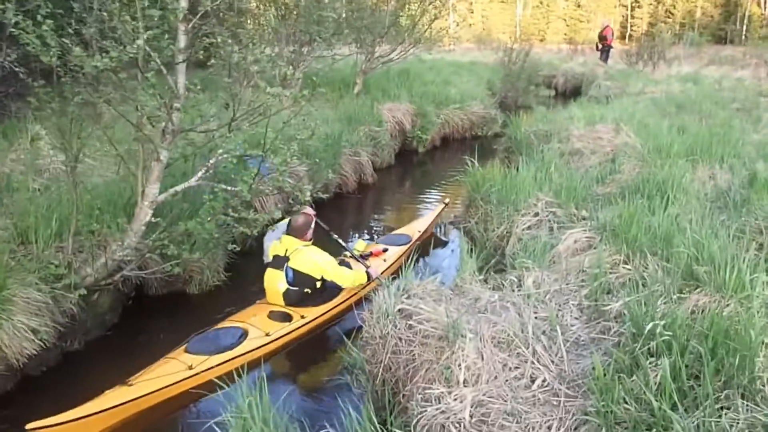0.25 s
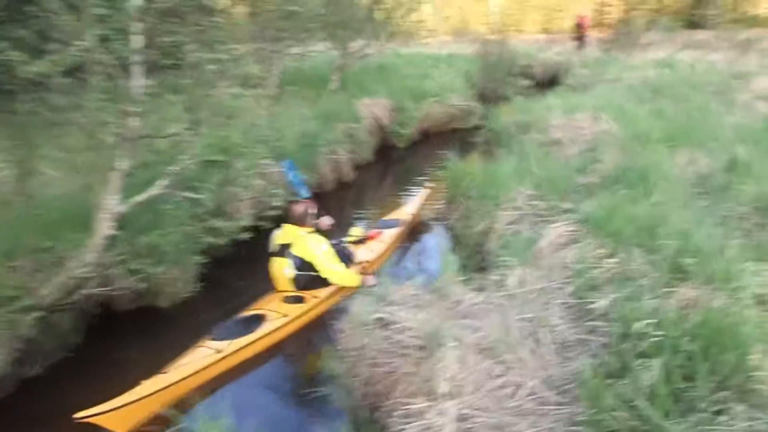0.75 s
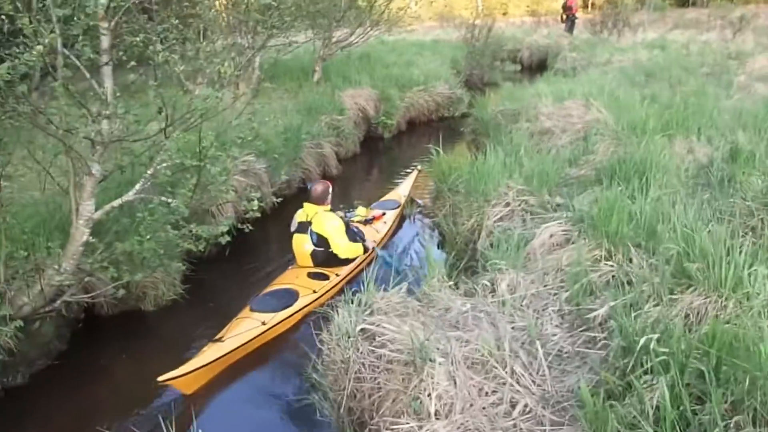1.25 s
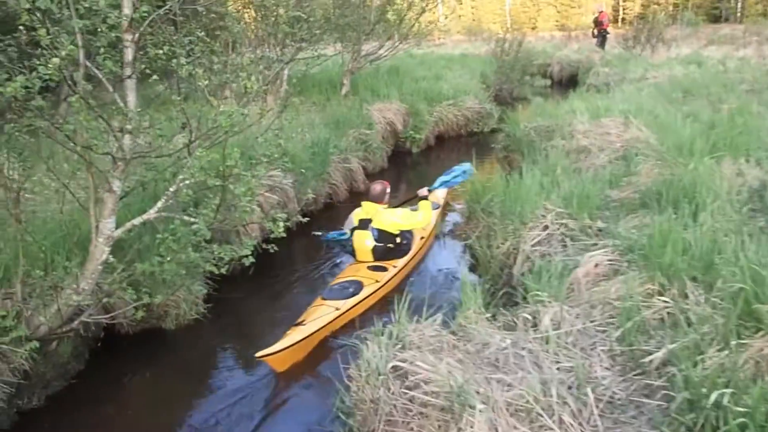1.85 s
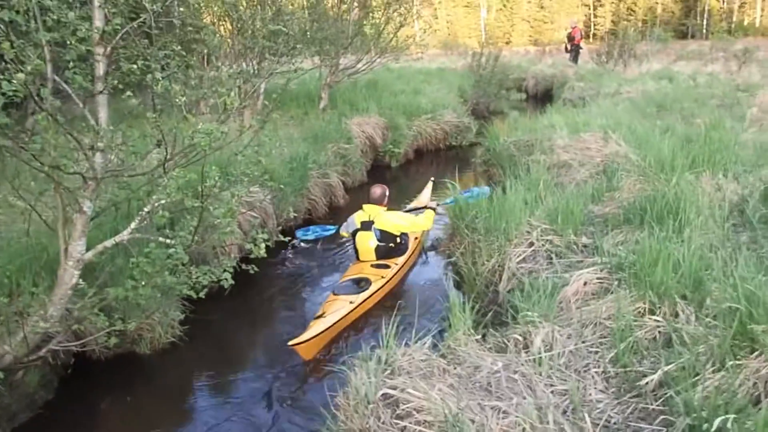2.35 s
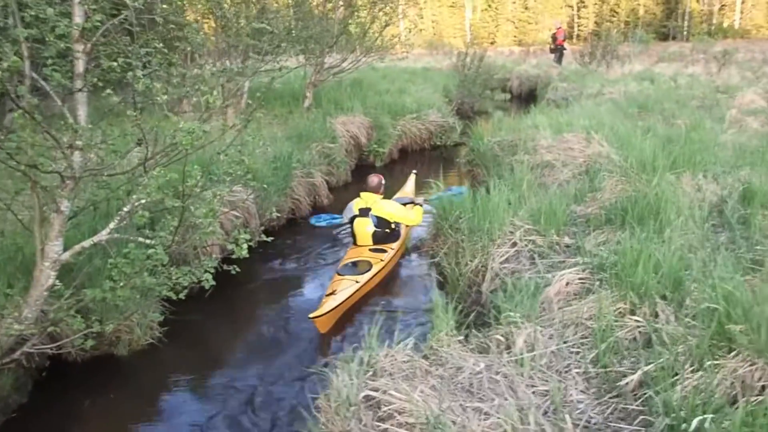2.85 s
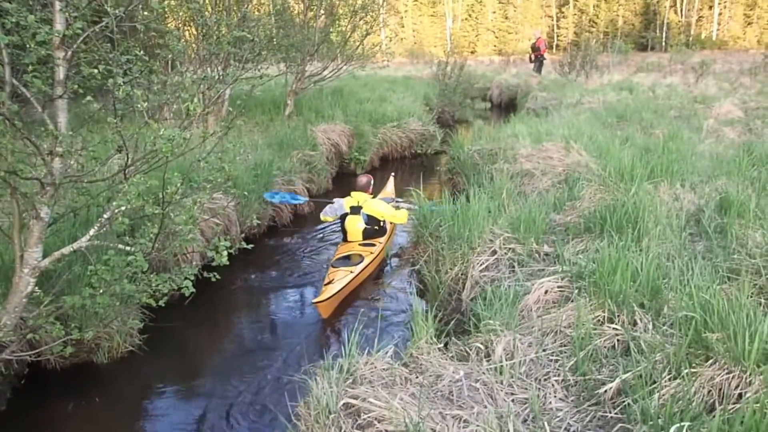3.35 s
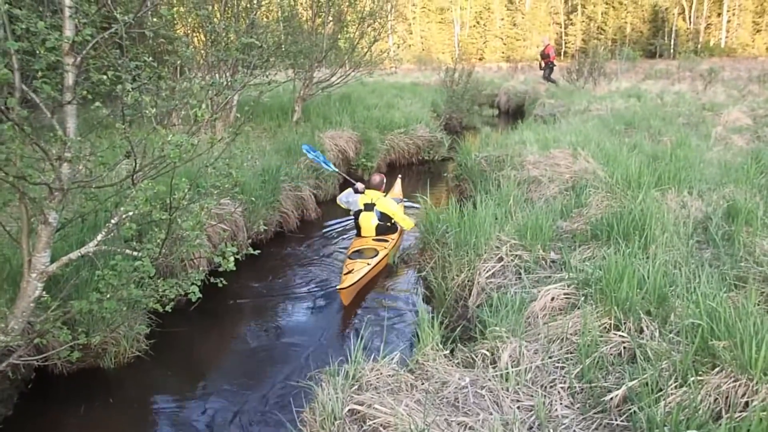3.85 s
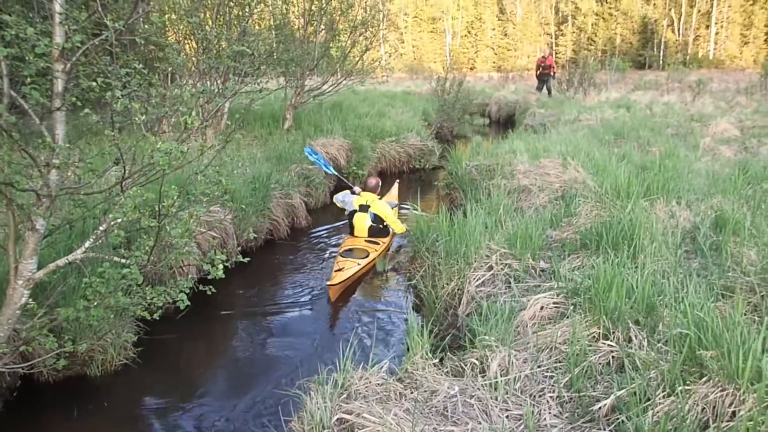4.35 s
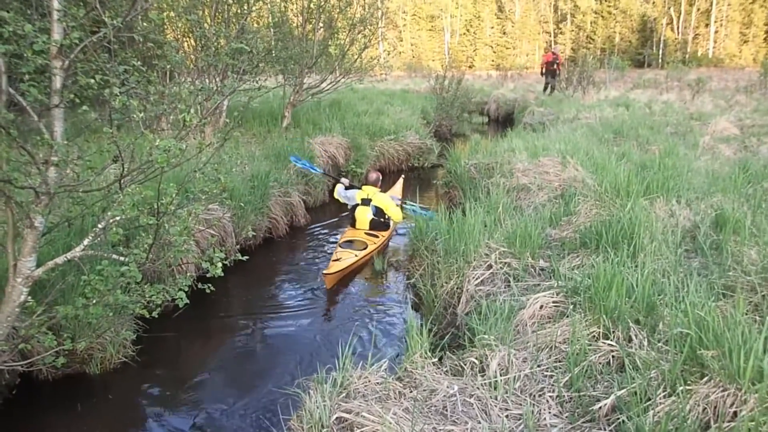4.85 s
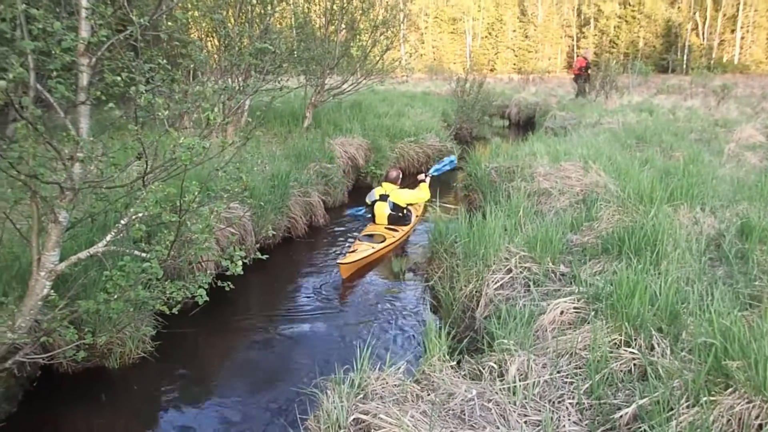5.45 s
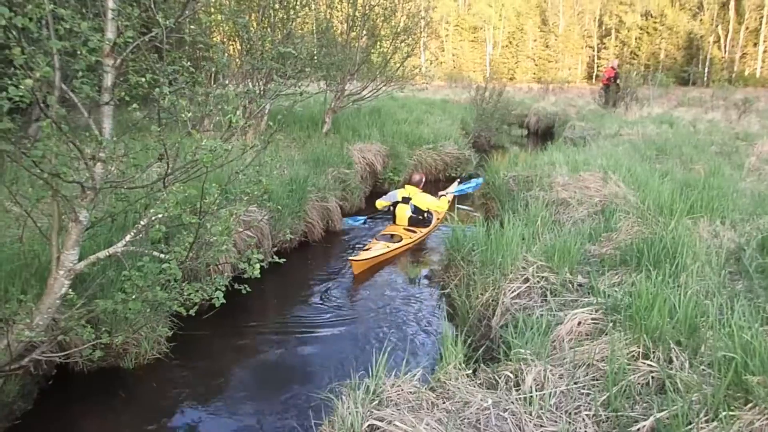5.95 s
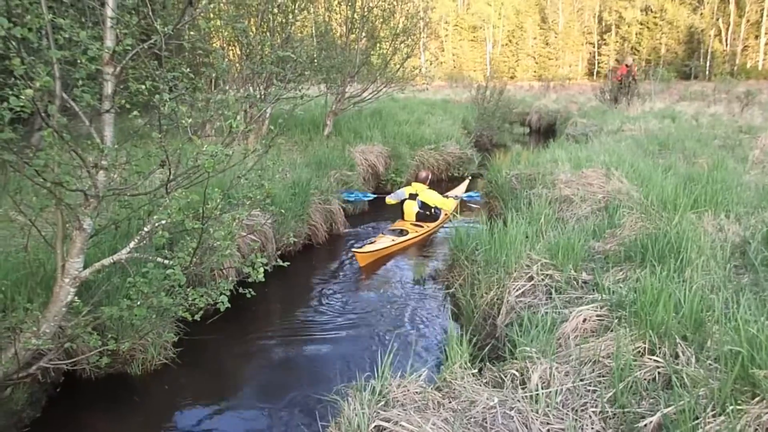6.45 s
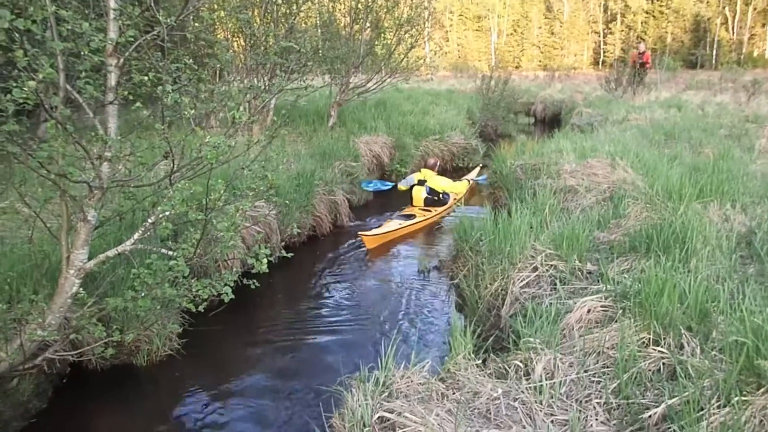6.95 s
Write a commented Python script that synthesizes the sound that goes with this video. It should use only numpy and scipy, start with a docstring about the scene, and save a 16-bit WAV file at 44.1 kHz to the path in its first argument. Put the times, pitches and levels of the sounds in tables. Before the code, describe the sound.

A kayak paddle dips through a narrow creek, heard from the grassy bank over a quiet wash of air and faint hiss. From the start to about 2.6 seconds, light splashes follow closely, each with fizzing spray, gurgles, small bubble plops, ticking drops and short slaps of water on the hull. Softer strokes come at about 3.3 seconds, from 4.4 to 5, and at 5.6, with trickling between them. Dry stalks snap sharply, close on the left, twice near 1.9 seconds, again at 2.6 and more faintly at 5.5, among soft low bumps. From 6 to 6.3 seconds the blade rasps lightly through bank grass on the right. Around 6.5 seconds comes a quick burst of snaps on the left, the loudest moment, followed by a crisp rustle of grass underfoot and a small bump. The last splashes fall between 6.6 and 7.2 seconds.

```python
"""A kayak paddle works along a narrow creek, heard from the grassy bank through a small camera's ports.
From the start each stroke sprays and gurgles; bubbles ring, water slaps the hull and drops tick.
Near 2 s dry stalks begin to snap close on the left, among soft bumps. At 6 s the blade brushes the bank;
a burst of snaps follows and grass rustles underfoot as the last strokes splash.
A quiet wash of air and the hiss of the preamplifiers lie under it all."""
import sys
import numpy as np
from scipy import signal
from scipy.io import wavfile
from scipy.ndimage import uniform_filter1d

SR = 44100
rng = np.random.default_rng(int(sys.argv[2]) if len(sys.argv) > 2 else 0)


def bounce(signal):
    """Save signal as a 16-bit WAV file at the path given by the first command-line argument."""
    frames = np.transpose(np.atleast_2d(signal))
    limited = np.clip(frames, -1, 1)
    pcm = np.round(limited * 32767).astype(np.int16)
    wavfile.write(sys.argv[1], SR, pcm)


N = 317520

# Splashes of the blade: peak_s, spray_db, gurgle_db, rise_s, fall_s
BLADE_SPLASHES = [(0.33, -45.5, -75, 0.084, 0.1), (0.46, -48, -44.5, 0.033, 0.088),
                  (0.549, -38, -42.5, 0.1, 0.062), (0.84, -42.5, -46.5, 0.23, 0.28),
                  (1.24, -51, -48, 0.41, 0.22), (1.47, -39.5, -57, 0.19, 0.061),
                  (1.74, -43.5, -69, 0.11, 0.089), (2.099, -42, -48, 0.12, 0.25),
                  (2.45, -40, -51, 0.14, 0.091), (3.27, -51, -57, 0.049, 0.33),
                  (4.39, -60, -54, 0.086, 0.2), (4.52, -46.5, -50, 0.098, 0.3),
                  (4.69, -51, -47, 0.18, 0.12), (4.98, -46, -62, 0.1, 0.14),
                  (5.621, -50.5, -50, 0.035, 0.81), (6.63, -40.5, -58, 0.064, 0.069),
                  (6.91, -44, -55, 0.082, 0.082), (7.15, -44, -56, 0.069, 0.23)]
# Water running off between splashes: time_s, spray_db, gurgle_db
RUNOFF = [(0.0, -50.5, -55.5), (1.9, -50.5, -62.5), (2.8, -56.5, -64), (3.498, -57, -63), (5.2, -57, -63),
          (5.45, -58, -74.5), (6.8, -51, -64), (7.2, -79, -63)]
def stroke_envelope(column):
    """Incoherent sources add in power: splash and runoff give the gain of spray (column 1) or gurgle (2)."""
    splash, runoff = np.transpose(BLADE_SPLASHES), np.transpose(RUNOFF)
    trickle = gain_of(np.interp(np.arange(N) / SR, runoff[0], runoff[column]))
    return np.hypot(trickle, swells(splash[0], splash[column], *splash[-2:]))

# Spectrum of droplets striking water: frequency_hz, gain_db
SPRAY_SPECTRUM = [(1200, -0.5), (3000, 1.5), (6000, 1.5), (10000, -8), (16000, -13)]
def spray():
    """Impact noise: thousands of droplets a second fizz onto the water in clumps; a few larger ones tick."""
    rings = swarm(1908, 12610, cycles=(2.4, 27), per_s=120, spread_db=3.4)
    fizz = 1.84 * rng.standard_normal(N)
    ticks = 0.5 * unit_rms(grains(per_s=70, spread_db=1.4))
    droplets = colour(rings + fizz + ticks, SPRAY_SPECTRUM)
    clumps = flutter(ms=8.3, db=1) * flutter(ms=27, db=1.4)
    return unit_rms(from_creek([droplets, droplets])) * clumps * stroke_envelope(column=1)

# Spectrum of churned water: frequency_hz, gain_db
GURGLE_SPECTRUM = [(120, -25), (280, -3.5), (750, 0), (1500, -1.5), (2300, -7), (4000, -34.5)]
def gurgle():
    """Bubble resonance in a swarm, over the broadband slosh of water round the blade."""
    bubbles = swarm(252.7, 2744, cycles=(2.9, 14), per_s=80, spread_db=1.2)
    water = unit_rms(colour(bubbles, GURGLE_SPECTRUM)) + 0.7 * unit_rms(noise(GURGLE_SPECTRUM))
    return unit_rms(from_creek([water, water])) * stroke_envelope(column=2) * flutter(ms=25, db=1.9)

# Larger single bubbles: peak_s, level_db, pitch_hz
LARGE_BUBBLES = [(0.352, -43, 1170), (0.445, -34.5, 800), (0.459, -41, 480), (0.515, -34.5, 1150),
                 (0.525, -30.5, 2310), (0.527, -38, 248.6), (0.725, -40.5, 885), (0.818, -37, 1420),
                 (0.949, -32.5, 1050), (1.226, -34.5, 1740), (1.302, -40, 1430), (2.118, -42, 510),
                 (2.133, -30.5, 663), (2.202, -39.5, 1120), (2.315, -41.5, 740), (2.365, -40, 647),
                 (3.235, -43, 647), (3.268, -46, 743), (3.27, -36.5, 1920), (3.308, -43, 1180),
                 (3.535, -43.5, 712), (3.62, -46, 1410), (3.703, -49, 776), (4.113, -47, 1750),
                 (4.413, -41, 1134), (4.481, -38.5, 764), (4.532, -35.5, 749), (4.67, -36, 634),
                 (4.714, -43.5, 690), (4.968, -39.5, 2330), (5.065, -45, 1630), (5.67, -45, 1170),
                 (5.865, -37, 1115), (5.87, -43.5, 607), (5.98, -40.5, 1007), (6.045, -43, 1114),
                 (6.265, -48, 636), (6.45, -44, 706)]
def plops():
    """Beating: each bubble rings against a weaker, detuned twin, roughened by the churning surface."""
    out = np.zeros(N)
    for s, db, hz in LARGE_BUBBLES:
        lag, detune = rng.uniform(-1.005, 1, 2)
        ring_ms = 19.5 * (hz / 1000) ** -0.8  # low bubbles ring longer
        add(out, s - ring_ms / 3000, gain_of(db) * ring(hz, ring_ms))
        add(out, s + lag * ring_ms / 2000, gain_of(db - 6) * ring(hz * 1.15 ** detune, ring_ms))
    out *= flutter(ms=3, db=2.5)
    return from_creek([out, out])

# Water slapping the hull: peak_s, level_db, pitch_hz
HULL_SLAPS = [(0.167, -33, 1110), (0.815, -35.5, 450), (0.988, -27.5, 650), (1.027, -35, 1400),
              (1.197, -27.5, 700), (1.244, -29, 870), (1.271, -31, 580), (1.509, -31.5, 690),
              (1.585, -35, 830), (2.217, -30, 750), (2.256, -22.5, 1530), (2.445, -29, 1450),
              (2.474, -32, 1360), (2.593, -29.5, 1750), (3.953, -29.5, 1170), (3.961, -31, 1650),
              (4.354, -36, 1040), (4.533, -25.5, 1340), (4.603, -35, 1700), (4.667, -32, 1600),
              (5.309, -28.5, 1430)]
def slaps(cycles=2.2):
    """Heavy damping: each slap on the hull dies within a few cycles."""
    out = np.zeros(N)
    for s, db, hz in HULL_SLAPS:
        add(out, s - cycles / hz / 3, gain_of(db) * ring(hz, 1000 * cycles / hz))
    return from_creek([out, out])

# Drops striking water and hull: start_s, level_db
DROP_IMPACTS = [(0.7294, -25.5), (0.86, -21.5), (1.345, -32), (1.7231, -33), (1.7932, -26), (1.8865, -27.5),
                (2.125, -29), (2.186, -27.5), (2.5945, -26), (2.638, -33), (2.705, -35), (2.734, -33),
                (3.2373, -31.5), (3.269, -36), (3.293, -33), (3.952, -30), (4.531, -26), (4.606, -31.5),
                (4.638, -30.5), (4.871, -30), (5.2105, -33), (5.308, -30), (5.577, -29), (5.626, -37),
                (7.158, -38)]
def drops():
    """Impact transients: ticks with a little patter after them, dulled by distance."""
    ticks = colour(cracks(*np.transpose(DROP_IMPACTS), tail_ms=3.1, tail_db=-5.5), SPRAY_SPECTRUM)
    return from_creek([ticks, ticks])

# Dry stalks breaking: start_s, crack_db, knock_db
STALK_SNAPS = [(1.8518, 3, -33), (1.9323, -3, -29.5), (2.622, -2.5, -25), (5.5182, -13.5, -35),
               (6.4767, 1.5, -28), (6.5204, -2.5, -41), (6.534, -15, -45), (6.5503, 3, -43),
               (6.5713, 2, -11.5), (6.5885, -5, -23), (6.5893, -1, -32), (6.5957, 14, -18),
               (6.6391, -2, -25)]
def snaps(shadow_db=-36):
    """Brittle fracture close on the left; the right port lies in the acoustic shadow of the camera body."""
    s, db, knock_db = np.transpose(STALK_SNAPS)
    knock = knocks(s, knock_db, hz=1900)
    left = cracks(s, db, tail_ms=0.72, tail_db=-24.5) + knock
    right = cracks(s, db + shadow_db, tail_ms=0.56, tail_db=-2) + 0.03 * knock
    return ports([left, right])

# Spectrum of a sharp crack: frequency_hz, gain_db
CRACK_SPECTRUM = [(1500, -8.5), (4500, 2.5), (10000, -0.5), (16000, -12)]
def cracks(times, db, tail_ms, tail_db):
    """Impulses are broadband: each sharp front trails an exponentially decaying crackle."""
    out, t = np.zeros(N), np.arange(400) / SR
    for s, level in zip(times, gain_of(db)):
        tail = gain_of(tail_db) * rng.standard_normal(len(t)) * np.exp(-1000 * t / tail_ms)
        add(out, s, level * ((t == 0) + tail))
    return colour(out, CRACK_SPECTRUM)

def knocks(times, db, hz):
    """Damped sinusoids: dull blows of little more than a cycle."""
    out, t = np.zeros(N), np.arange(400) / SR
    blow = np.sin(2 * np.pi * hz * t) * np.exp(-1.2 * hz * t)
    for s, level in zip(times, gain_of(db)):
        add(out, s, level * blow / blow.max())
    return out

# The blade dragging through the grass of the bank: peak_s, level_db
BLADE_DRAGS = [(6.072, -38), (6.145, -42), (6.19, -40.5), (6.28, -43)]
def brush():
    """Friction: wet stalks rasp along the blade in a narrow, grainy band from the right."""
    rasp = stereo(lambda: swarm(4800, 5800, cycles=(4, 9), per_s=150, spread_db=1.5), correlation=0.64)
    envelope = swells(*np.transpose(BLADE_DRAGS), rise_s=0.029, fall_s=0.044)
    return unit_rms(from_creek(rasp * gain_of([[-3], [3]]))) * envelope * flutter(ms=7.1, db=1.2)

# Grass bending underfoot: peak_s, level_db
GRASS_STEPS = [(6.62, -46.5), (7.17, -57)]
def rustle():
    """Small sources radiate treble best: dry grass crackles brightly, close on the left."""
    def blades():
        ticks = unit_rms(grains(per_s=820, spread_db=1.6))
        crackle = colour(ticks + 0.5 * rng.standard_normal(N), CRACK_SPECTRUM)
        return crackle - np.roll(crackle, 1)
    grass = ports(stereo(blades, correlation=0.2) * gain_of([[4], [-4]]))
    envelope = swells(*np.transpose(GRASS_STEPS), rise_s=0.057, fall_s=0.14)
    return unit_rms(grass) * envelope * flutter(ms=9, db=2)

# Soft bumps: start_s, level_db, pitch_hz, left_minus_right_db
BODY_BUMPS = [(1.965, -51, 65.4, 0), (2.846, -48.5, 110, 0), (5.422, -49.5, 75, -1), (5.865, -46, 134, 0),
              (6.896, -40, 227, 20), (6.906, -34, 486, 24), (6.923, -39, 1070, 33)]
def bumps():
    """Structure-borne sound: pushes of one or two cycles arrive through ground and camera body."""
    out = np.zeros((2, N))
    for s, db, hz, pan_db in BODY_BUMPS:
        gains = gain_of([[db + pan_db / 2], [db - pan_db / 2]])
        add(out, s, gains * ring(hz, 1500 / hz, climb_hz_per_ms=0))
    return out

# Spectrum of the ambience: frequency_hz, gain_db
AIR_SPECTRUM = [(30, -3), (200, -1.5), (1000, -8), (2500, -16.5), (6000, -23.5), (12000, -16)]
def air():
    """Diffuse sound: leaves, far water and breeze merge into a soft, partly correlated wash."""
    wash = stereo(lambda: noise(AIR_SPECTRUM), correlation=0.38)
    return gain_of(-55.5) * unit_rms(ports(wash)) * flutter(ms=120, db=0.26)

def from_creek(pair):
    """Path difference: the creek lies a little to the right, so the left port hears it one sample late."""
    return ports([np.roll(pair[0], 1), pair[1]])

# Response of the microphone ports: frequency_hz, left_db, right_db
PORT_RESPONSE = [(30.4, -18, -11), (215, -6.5, -2), (2090, -2, -2), (2845, -9, -15), (3394, -2, -1),
                 (4110, -8, -13), (4554, 4, 2.5), (5185, 5, 11.5), (6150, -1, 4), (7420, 2, 1),
                 (7640, -0.5, -10), (7820, 8, 9), (8480, 5, 4), (10200, 2, -2), (12240, -4, -2.5)]
def ports(pair):
    """Resonance of the housing gives each port its own peaks and notches."""
    return np.array([colour(x, PORT_RESPONSE, column=k + 1) for k, x in enumerate(pair)])

def ring(hz, ms, climb_hz_per_ms=4.57):
    """A damped oscillator swells fast and dies; its pitch climbs like that of a bubble near the surface."""
    age = np.arange(round(2 * ms * SR / 1000)) / (ms * SR / 1000)
    envelope = (3 * age * np.exp(1 - 3 * age)) ** 2  # peaks at a third of ms
    pitch_hz = hz + climb_hz_per_ms * ms * (np.minimum(age, 1) - 0.25)
    return envelope * np.sin(2 * np.pi * np.cumsum(pitch_hz) / SR)

def swarm(low_hz, high_hz, cycles, per_s, spread_db):
    """Random excitation of 24 resonators, each struck about per_s times a second."""
    out = np.zeros(N)
    for hz, count in zip(np.geomspace(low_hz, high_hz, 24), rng.uniform(*cycles, 24)):
        tone = ring(hz, 1000 * count / hz)
        out += signal.oaconvolve(grains(per_s, spread_db), tone * hz ** 0.5 / np.linalg.norm(tone))[:N]
    return unit_rms(out)

def grains(per_s, spread_db):
    """A Poisson process: sparse clicks of random sign, most small, a few large."""
    size = gain_of(spread_db * np.minimum(rng.exponential(1, N), 4)) * rng.standard_normal(N)
    return size * (rng.random(N) < per_s / SR)

def swells(times, db, rise_s, fall_s):
    """Power summation of overlapping swells, each 10 dB down one rise or fall time from its peak."""
    samples = np.arange(0, N + 64, 64)
    t = samples[:, None] / SR - times
    level_db = db - 10 * np.maximum(-t / rise_s, t / fall_s)
    return np.interp(np.arange(N), samples, np.sqrt(gain_of(2 * level_db).sum(1)))

def flutter(ms, db):
    """Amplitude modulation by noise smoothed over ms, with an rms depth of db."""
    size = round(ms * SR / 1000)
    return gain_of(db * unit_rms(uniform_filter1d(uniform_filter1d(rng.standard_normal(N), size), size)))

def stereo(make, correlation):
    """Partial coherence: two channels share a part of their sound."""
    left, other = make(), make()
    return np.array([left, correlation * left + np.sqrt(1 - correlation ** 2) * other])

def noise(spectrum):
    """Spectral shaping of white noise."""
    return colour(rng.standard_normal(N), spectrum)

def colour(x, points, column=1):
    """Minimum-phase filter: the gain follows a table, the phase the Hilbert transform of the log gain."""
    table, hz = np.array(points), abs(np.fft.fftfreq(4096, 1 / SR))
    log_gain = np.log(gain_of(np.interp(np.log(hz + 1), np.log(table[:, 0] + 1), table[:, column])))
    taps = np.fft.ifft(np.exp(np.conj(signal.hilbert(log_gain)))).real[:2048]
    return signal.oaconvolve(x, taps)[:len(x)]

def gain_of(db):
    """Decibels to an amplitude ratio."""
    return 10 ** (np.asarray(db) / 20)

def unit_rms(x):
    """Normalisation to an rms of one."""
    return x / np.sqrt(np.mean(x ** 2) + 1e-20)

def add(mix, start_s, sound):
    """Superposition of a short sound on the mix."""
    part = mix[..., max(round(start_s * SR), 0):][..., :sound.shape[-1]]
    part += sound[..., :part.shape[-1]]

def scene():
    """Superposition of all sources at the microphone capsules."""
    paddling = spray() + gurgle() + plops() + slaps() + drops()
    return paddling + snaps() + brush() + rustle() + bumps() + air()

# Spectrum of the preamplifier noise: frequency_hz, gain_db
HISS_SPECTRUM = [(25, 0), (90, 9), (400, 11.5), (2000, 1), (6000, -49), (16000, -6)]
def record(dry):
    """Self-noise adds a faint hiss; then peaks are clipped and treble above about 15.7 kHz is cut off."""
    hiss = np.array([unit_rms(noise(HISS_SPECTRUM)) for _ in dry]) * gain_of([[-60], [-58]])
    low_pass = signal.firwin(511, 15750, window=("kaiser", 9), fs=SR)
    return signal.oaconvolve(np.clip(dry + hiss, -1, 1), low_pass[None], "same")

dry = scene()
out = record(dry)
bounce(out)
```